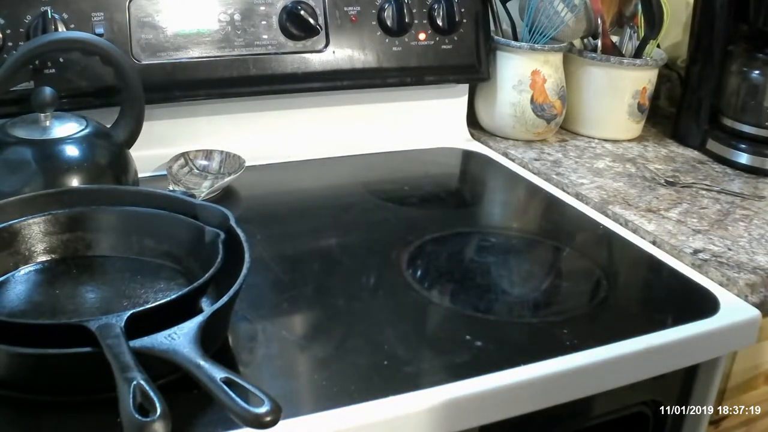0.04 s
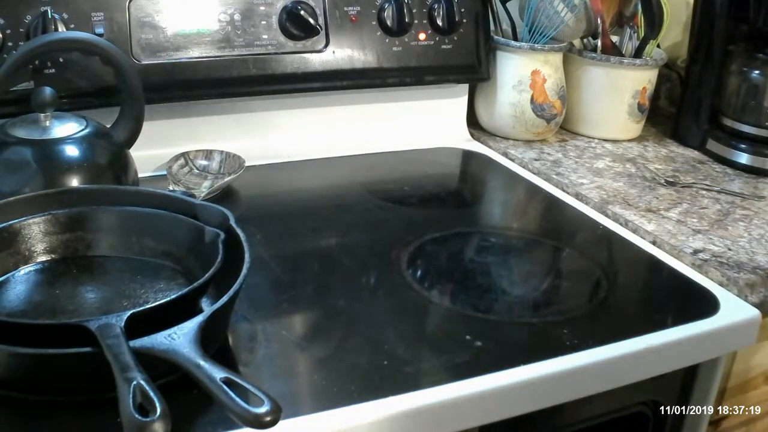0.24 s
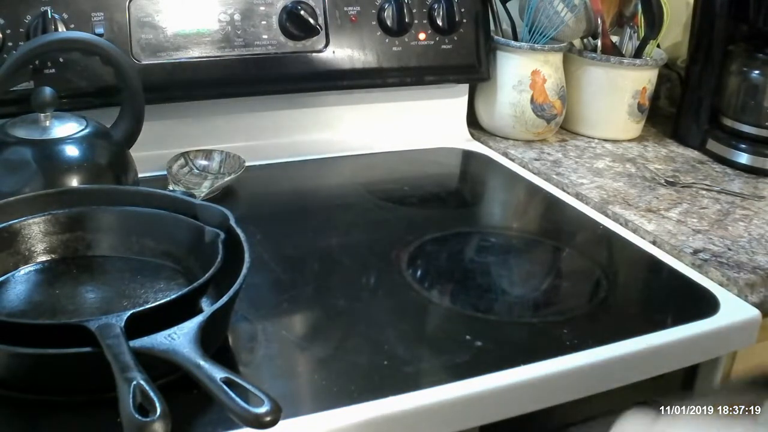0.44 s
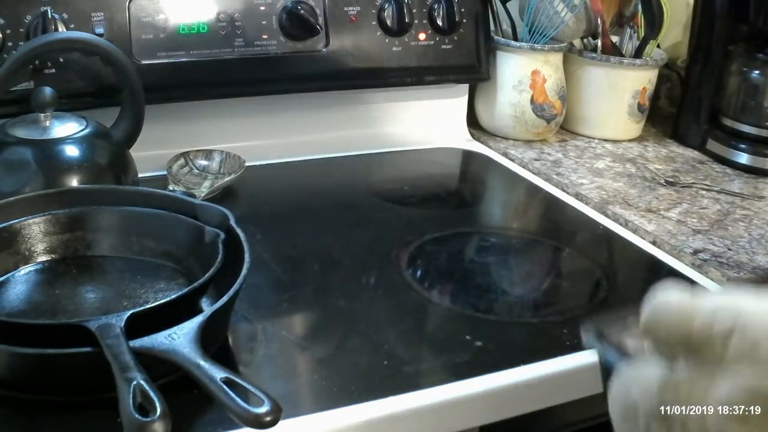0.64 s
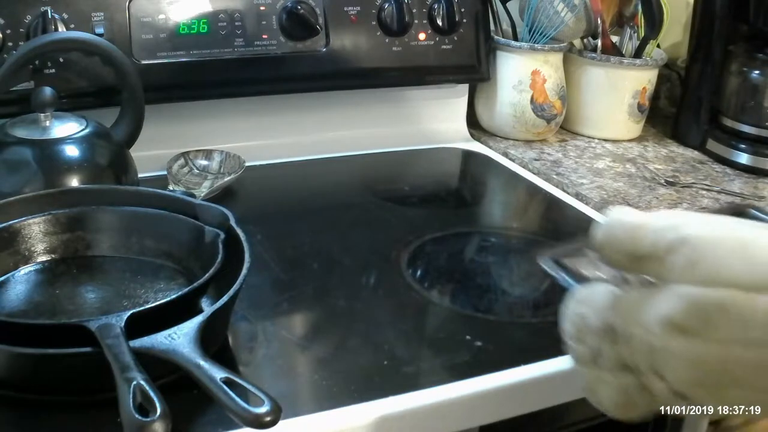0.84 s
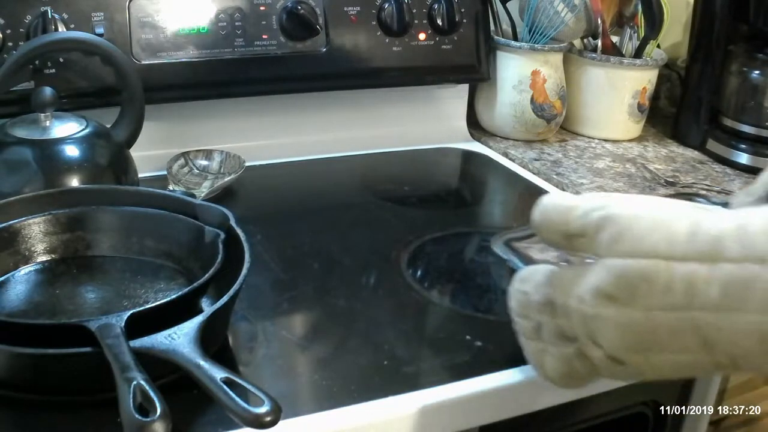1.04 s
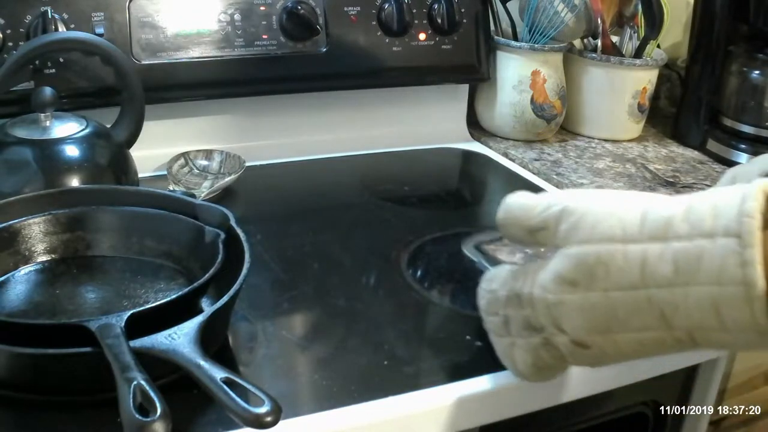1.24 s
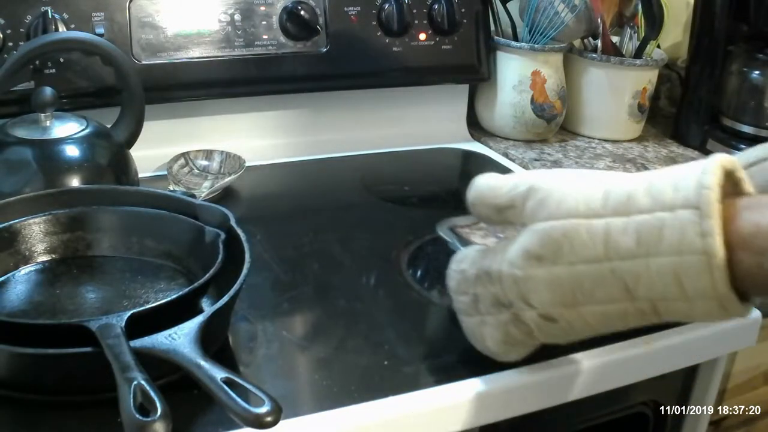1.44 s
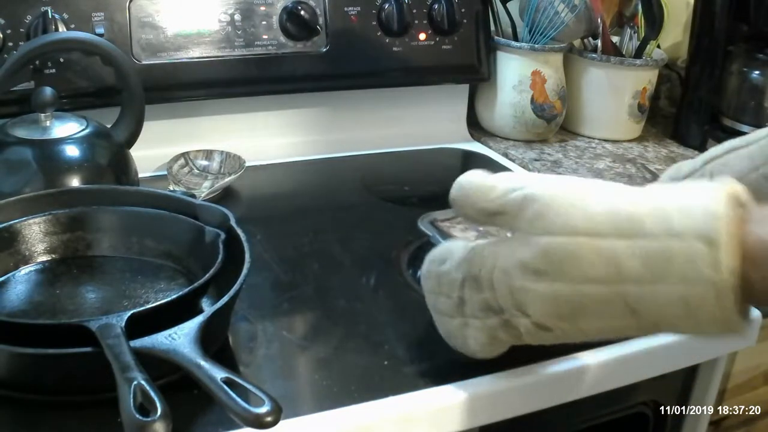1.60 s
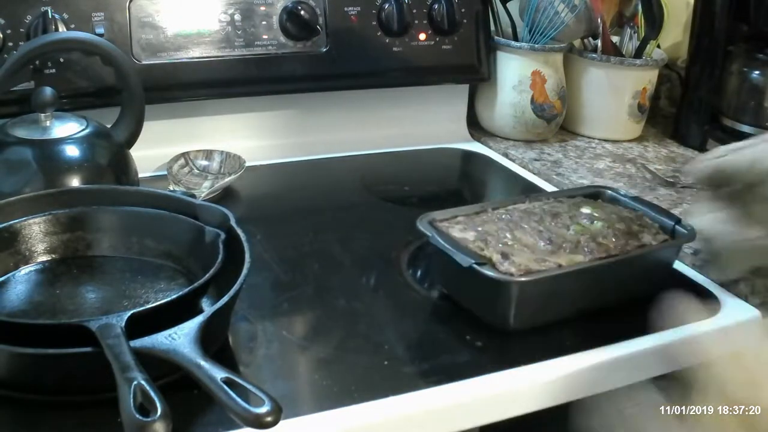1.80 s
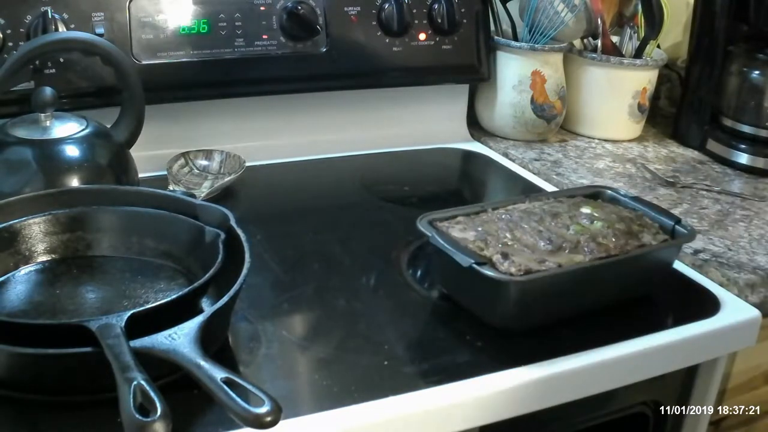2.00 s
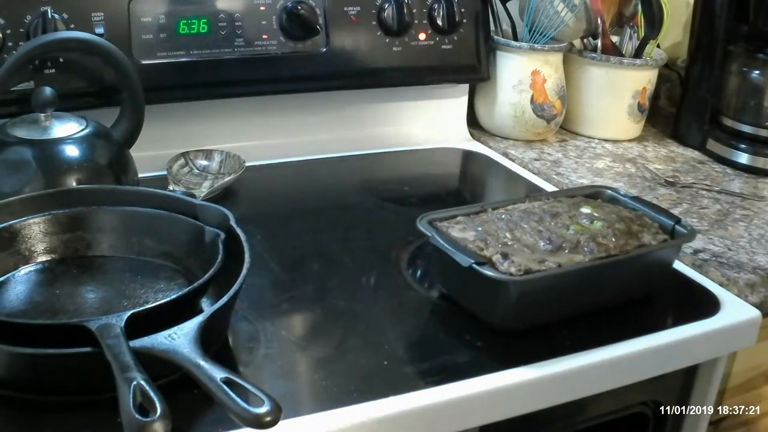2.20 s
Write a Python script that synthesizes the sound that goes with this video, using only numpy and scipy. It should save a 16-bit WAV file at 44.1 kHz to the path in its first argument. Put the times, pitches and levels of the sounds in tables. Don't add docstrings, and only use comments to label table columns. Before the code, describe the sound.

Hard metallic clank of a full baking pan set on a stovetop, with a short gritty slide

```python
import sys
import numpy as np
from scipy import signal
from scipy.io import wavfile
from scipy.ndimage import uniform_filter1d

SR = 44100
rng = np.random.default_rng(int(sys.argv[2]) if len(sys.argv) > 2 else 0)


def volts_from_db(level):
    exponent = np.asarray(level, float) / 20
    return 10 ** exponent


def to_wav(s):
    ch = np.atleast_2d(s).T
    pcm = np.round(np.clip(ch, -1, 1) * 32767)
    wavfile.write(sys.argv[1], SR, pcm.astype(np.int16))


N = 99489


def evened(x):
    return x / np.sqrt(np.mean(x ** 2) + 1e-20)


def read(points, hz):
    f, value = np.transpose(points)
    return np.interp(np.log(hz + 1), np.log(f + 1), value)


def colour(x, points):
    log_gain = read(points, abs(np.fft.fftfreq(8192, 1 / SR))) * np.log(10) / 20
    taps = np.fft.ifft(np.exp(np.conj(signal.hilbert(log_gain)))).real[:4096]
    return signal.oaconvolve(x, taps)[:len(x)]


def resonate(x, hz, width_hz):
    r = np.exp(-np.pi * width_hz / SR)
    return 2 * signal.lfilter([1 - r], [1, -r * np.exp(2j * np.pi * hz / SR)], x).real


def add(mix, at_s, sound):
    part = mix[round(at_s * SR):][:len(sound)]
    part += sound[:len(part)]


# (frequency [Hz], level [dB])
CRACK_SPECTRUM = [(300, -7.5), (1500, 11.5), (2800, -0.5), (4500, -9.5), (5800, -19.5), (7500, -19),
                  (15000, -32.5)]


def blows(table, modes, crack_db, rise_s, scatter, swell_db=0):
    scatter_db, detune = 5, 0.053
    crack_t60_s, damped_t60_s = 0.19, 0.027
    out, t = np.zeros(N), np.arange(9000) / SR
    hz, db, t60_s = np.transpose(modes)[:, :, None]
    for k, (at_s, strength_db, free_s) in enumerate(table):
        spot, shift = scatter * rng.standard_normal((2, len(modes), 1)) * (k > 0)
        decay = volts_from_db(db + scatter_db * spot - 60 * t / t60_s)
        ring = decay * np.sin(2 * np.pi * hz * (1 + detune * shift) * t)
        ring = ring[::2].sum(0) - ring[1::2].sum(0)
        swell = swell_db * (np.minimum(t / free_s, 1) - 1.5)
        damping = -60 * np.maximum(t - free_s, 0) / damped_t60_s
        shape = np.minimum(t / rise_s, 1) * volts_from_db(swell + damping)
        crack = evened(colour(rng.standard_normal(len(t)), CRACK_SPECTRUM))
        crack = crack * volts_from_db(crack_db - 60 * t / crack_t60_s)
        add(out, at_s, volts_from_db(strength_db) * (ring * shape + crack))
    return out


# (time [s], strength [dB], free ring [s])
LANDING_BLOWS = [
    (1.1965, -9.5, 0.0082),
    (1.2135, -23.5, 0.003),
    (1.2185, -18.5, 0.0037),
]
# (frequency [Hz], level [dB], t60 [s])
FLAT_MODES = [(257, 2, 0.059), (394, -10.5, 0.3), (488, -6.5, 0.56), (592, -1.5, 0.054), (697, 4, 0.046),
              (817, 0, 0.12), (987, -2, 0.09), (1253, -1.5, 0.055), (1450, -27, 0.19), (1780, -13, 0.084),
              (1960, -31, 0.084), (2540, -24, 0.27), (2710, -34, 0.17), (3460, -24, 0.056)]


def landing():
    return blows(LANDING_BLOWS, FLAT_MODES, -13.5, 0.0014, 0.75)


# (time [s], strength [dB], free ring [s])
FLOOR_SLAPS = [
    (1.2042, -2, 0.0085),
    (1.236, -16, .008),
]
# (frequency [Hz], level [dB], t60 [s])
FLOOR_MODES = [(639, -2, 0.13), (490, -11.5, 0.12)]


def floor_slaps():
    return blows(FLOOR_SLAPS, FLOOR_MODES, -22, 0.00092, 0.2)


# (time [s], strength [dB], free ring [s])
CORNER_TOUCHES = [
    (1.1938, -7.5, 0.0017),
    (1.698, -48, .006),
    (2.128, -55, .004),
]
# (frequency [Hz], level [dB], t60 [s])
CORNER_MODES = [(653, 2.5, 0.018), (1660, -16, .04), (930, -3.5, .04), (2660, -22, .04)]


def corner_touches():
    return blows(CORNER_TOUCHES, CORNER_MODES, -25.5, 0.00058, 0.3)


# (time [s], strength [dB], free ring [s])
EDGE_KNOCKS = [
    (1.396, -18.5, 0.0034),
    (1.4015, -16, 0.014),
    (1.512, -35.5, 0.016),
    (1.53, -33.5, 0.032),
]
# (frequency [Hz], level [dB], t60 [s])
EDGE_MODES = [(261.6, 3, 0.35), (360, -12, .1), (508, -2, 0.32), (588.5, 5, 0.16), (704, -10, 0.2),
              (860, -20, 0.024), (983, -6, 0.23), (1200, -15, 0.054), (1410, -27, 0.05), (1730, -17, .05),
              (2670, -49, .1)]


def edge_knocks():
    return blows(EDGE_KNOCKS, EDGE_MODES, -25, 0.002, 0.23, swell_db=5)


# (time [s], strength [dB], free ring [s])
ROCK_BLOWS = [(1.224, -20, 0.0085), (1.236, -27, 0.01), (1.253, -25, 0.023), (1.270, -28, 0.0056),
              (1.279, -34, 0.0047), (1.295, -35, 0.0098), (1.313, -56, 0.0029), (1.423, -29.5, 0.012),
              (1.439, -34, 0.018), (1.453, -35, 0.021), (1.468, -32.5, 0.0033), (1.478, -46, 0.0021)]
# (frequency [Hz], level [dB], t60 [s])
ROCK_MODES = [(302, -11, 0.043), (373, -6, 0.027), (502, 1, 0.13), (590, -23, 0.19), (651, -1, 0.17),
              (745, -0.5, 0.12), (1040, -18, 0.089), (1280, -5.5, 0.065), (1520, -17, 0.045),
              (1695, -16, 0.2), (2420, -36, 0.077)]


def rocking():
    return blows(ROCK_BLOWS, ROCK_MODES, -18, 0.00035, 0.52)


# (time [s], strength [dB], free ring [s])
RIM_BLOWS = [
    (1.1985, -25.5, 0.0065),
    (1.206, -26.5, 0.014),
    (1.219, -32, 0.016),
    (1.24, -40, 0.023),
    (1.275, -43, .008),
    (1.405, -45, 0.011),
    (1.487, -48.5, 0.019),
    (2.132, -43.5, 0.0038),
]
# (frequency [Hz], level [dB], t60 [s])
RIM_MODES = [(1600, 0, 0.23), (2280, -4, 0.052), (2580, -2, 0.21), (3285, -9, 0.17), (3970, -10.5, 0.071),
             (4480, -10, 0.034)]


def rim_chatter():
    return blows(RIM_BLOWS, RIM_MODES, -23, 0.0015, 0.42)


# (time [s], strength [dB], free ring [s])
MITT_NUDGES = [
    (2.133, -39, 0.043),
    (2.155, -36.5, 0.0085),
    (2.169, -35, 0.0022),
    (2.179, -45, 0.033),
    (2.193, -44, 0.029),
]
# (frequency [Hz], level [dB], t60 [s])
DULL_MODES = [(208, -22, 0.11), (268, 5, 0.25), (470, -8, 0.047), (672, -6, 0.095)]


def mitt_nudges():
    return blows(MITT_NUDGES, DULL_MODES, -37, 0.0023, 0.39)


# (time [s], pressure [dB], weight on pan floor [dB])
STROKE_SETTLE = [(1.409, -60, 7), (1.445, -50, -8), (1.465, -46.5, -5), (1.49, -48, -8), (1.515, -49.5, -3),
                 (1.55, -58, 8), (1.62, -65, 8)]
STROKE_MAIN = [(1.696, -43.5, 5), (1.715, -40, -8.5), (1.735, -40, -4.5), (1.76, -39, 1),
               (1.785, -37.5, 0.5), (1.807, -40, -2), (1.822, -45, -2.5), (1.844, -48.5, -0.5),
               (1.875, -57.5, -4)]
STROKE_NUDGE = [(1.875, -61, 0), (1.93, -60.5, 0), (2.04, -58, 0), (2.122, -60.5, 0.004), (2.131, -47.5, 0),
                (2.15, -49, 0), (2.175, -57.5, 0), (2.25, -66, 0)]
# (frequency [Hz], width [Hz], level [dB])
BODY_MODES = [(559, 210, 8), (707, 170, 3.5), (1608, 34, -3), (1391, 19, -7), (1080, 88, -17),
              (2336, 35, -12.5), (2720, 36, -13.5), (3246, 76, -16), (3800, 92, -13), (4580, 60, -20),
              (4820, 59, -27)]
# (frequency [Hz], level [dB])
BROAD_RUB = [(200, -20.5), (570, -3.5), (1000, -3), (1630, -5.5), (2100, -5), (3000, -32.5), (6000, -50),
             (15000, -52)]
BRIGHT_RUB = [(1200, -32.5), (2000, -2.5), (2700, -1.5), (3400, -9.5), (4200, -13), (6000, -38),
              (15000, -47)]
FIZZ_SPECTRUM = [(3000, -25), (4200, -7), (5200, 11), (6500, -6), (15000, -26)]
# (low body level [dB]), (fizz level [dB])
STROKE_LOW_DB = [2, -4, -23]
STROKE_FIZZ_DB = [-6, -10.5, -11]


def slides():
    grit_per_s, grit_spread_db, catch_db = 5900, 3, 1
    rub_db, broad_db, firm_db = 0.5, 4, -37.5
    low_growth, fizz_growth, broad_weight_share = 0.34, 0.14, 0.51
    ramp_s = 0.0045
    t, out = np.arange(N) / SR, np.zeros(N)
    hits = (rng.random(N) < grit_per_s / SR) * rng.choice([-1., 1.], N)
    grit = hits * volts_from_db(grit_spread_db * rng.exponential(1, N).clip(0, 4))
    density = uniform_filter1d(abs(grit), size=300)
    grit = grit * volts_from_db(catch_db * evened(density - density.mean()))

    body = [volts_from_db(db) * evened(resonate(resonate(grit, hz, width_hz), hz, 2 * width_hz))
            for hz, width_hz, db in BODY_MODES]
    low, high = sum(body[:4]), sum(body[4:])
    broad = volts_from_db(broad_db) * evened(colour(grit, BROAD_RUB))
    bright = 0.64 * volts_from_db(broad_db) * evened(colour(grit, BRIGHT_RUB))
    fizz = evened(colour(grit, FIZZ_SPECTRUM))

    strokes = (STROKE_SETTLE, STROKE_MAIN, STROKE_NUDGE)
    for stroke, low_db, fizz_db in zip(strokes, STROKE_LOW_DB, STROKE_FIZZ_DB):
        at_s, pressure_db, weight_db = np.transpose(stroke)
        press_db = np.interp(t, at_s, pressure_db)
        weight_db = np.interp(t, at_s, weight_db)
        firmness_db = press_db - firm_db
        push = volts_from_db(press_db) * np.clip(np.minimum(t - at_s[0], at_s[-1] - t) / ramp_s, 0, 1)
        rub = volts_from_db(low_db + weight_db + low_growth * firmness_db) * low + high + bright
        rub += volts_from_db(broad_weight_share * weight_db) * broad
        out += push * (volts_from_db(rub_db) * rub + volts_from_db(fizz_db + fizz_growth * firmness_db) * fizz)
    return out


def rattle(pan):
    level_db, hold_s, low_cut_hz, fade_db_per_s = -48, 0.016, 5500, 260
    t = np.arange(N) / SR - LANDING_BLOWS[0][0]
    high_pass = signal.butter(2, low_cut_hz, "high", fs=SR, output="sos")
    buzz = signal.sosfilt(high_pass, rng.standard_normal(N) * (0.3 + 4 * abs(pan)))
    return (t > 0) * volts_from_db(level_db - fade_db_per_s * np.maximum(t - hold_s, 0)) * buzz


# (time [s], strength [dB], frequency [Hz], t60 [s])
FRAME_SWINGS = [
    (1.235, -53, 71, 0.39),
    (1.239, -42, 116.6, 0.23),
    (1.33, -47, 104, 0.22),
    (1.6, -54, 66, 0.33),
    (1.408, -39, 72.8, 0.079),
    (1.51, -55, 60, 0.27),
    (1.722, -44, 104, 0.16),
    (2.149, -52, 134, 0.23),
]


def shudders():
    rise_s = 0.014
    out, t = np.zeros(N), np.arange(12000) / SR
    for at_s, db, hz, t60_s in FRAME_SWINGS:
        swing = volts_from_db(db - 60 * t / t60_s) * np.sin(2 * np.pi * hz * t)
        add(out, at_s, np.minimum(t / rise_s, 1) * swing)
    return out


# (frequency [Hz], t60 [s])
ROOM_T60 = [(100, 0.5), (500, 0.39), (1500, 0.35), (4000, 0.43), (10000, 0.34)]


def kitchen(x):
    at = np.arange(200, SR // 2, 20)
    taps = np.zeros(SR // 2 + 40)
    taps[at + rng.integers(0, 20, len(at))] = rng.choice([-1., 1.], len(at))
    hz, t, z = signal.stft(taps, SR, nperseg=256)
    decay = volts_from_db(-60 * t / read(ROOM_T60, abs(hz))[:, None])
    tail = signal.istft(z * decay, SR, nperseg=256)[1]
    return signal.fftconvolve(x, tail / np.linalg.norm(tail))[:N]


# (frequency [Hz], level [dB rms])
MOTOR_LINES = [(59.2, -69), (119, -70), (160.8, -53.5), (355.3, -38.5), (473.7, -57.5)]
LINE_WAVER_DB = [0.8, 1, 2.2, 0.45, 3.5]
# (frequency [Hz], level [dB])
AIR_SPECTRUM = [(25, -49), (90, -22.5), (200, -11), (330, -0.5), (520, -1.5), (850, -10.5), (3500, -25.5),
                (6000, -35)]


def fan():
    air_db, patch_db, top_waver_hz = -43.5, 1, 12
    t, out = np.arange(N) / SR, np.zeros(N)
    for (hz, db), waver_db in zip(MOTOR_LINES, LINE_WAVER_DB):
        drift = evened(sum(np.sin(2 * np.pi * (f * t + rng.random())) / np.sqrt(f)
                           for f in np.geomspace(0.5, top_waver_hz, 16)))
        line = np.sin(2 * np.pi * (hz * t + rng.random()))
        out += np.sqrt(2) * volts_from_db(db + waver_db * drift) * line
    hz = np.fft.rfftfreq(2048, 1 / SR)
    a, b, patches = rng.standard_normal((N // 512 + 5, 1025, 3)).T
    patches = uniform_filter1d(patches, size=16, axis=0)
    patches = evened(uniform_filter1d(patches, size=6, axis=1))
    z = (a + 1j * b) * volts_from_db(read(AIR_SPECTRUM, hz)[:, None] + patch_db * patches)
    air = signal.istft(z, nperseg=2048, noverlap=1536)[1][:N]
    return out + volts_from_db(air_db) * evened(air)


def scene():
    kitchen_db, swing_limit, low_cut_hz = -10.5, 0.8, 216
    pan = landing() + floor_slaps() + corner_touches() + edge_knocks()
    pan += rocking() + rim_chatter() + mitt_nudges() + slides()
    pan = pan / (1 + abs(pan / swing_limit) ** 4) ** 0.25
    pan = signal.sosfilt(signal.butter(4, low_cut_hz, "high", fs=SR, output="sos"), pan)
    return (pan + volts_from_db(kitchen_db) * kitchen(pan) + rattle(pan) + shudders() + fan())[None]


def band_limit(x):
    return signal.sosfilt(signal.butter(12, 15750, fs=SR, output="sos"), x)


# (frequency [Hz], level [dB])
MIC_HOUSING = [(850, 2), (1120, -5), (1500, 3.5), (1700, 2.5), (2000, -5.5), (2400, 5), (2800, 2.5),
               (5500, -5)]
# (frequency [Hz], level [dB])
MIC_HISS = [(1000, 6.5), (7000, 3.5), (13000, -5), (16000, -29)]


def record(dry):
    hiss_db, ceiling, band_hz = -61, 0.96, 15690
    hiss = evened(colour(rng.standard_normal(N), MIC_HISS))
    x = colour(dry[0], MIC_HOUSING) + volts_from_db(hiss_db) * hiss
    x = x / (1 + abs(x / ceiling) ** 12) ** (1 / 12)
    low_pass = signal.firwin(301, band_hz, window=("kaiser", 8), fs=SR)
    x = signal.oaconvolve(x, low_pass, "same")
    return band_limit(x[None])


dry = scene()
out = record(dry)
to_wav(out)
```